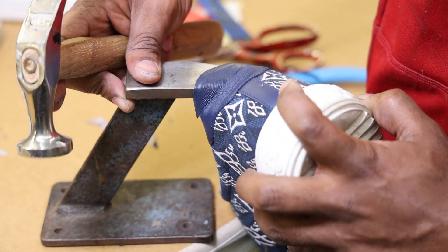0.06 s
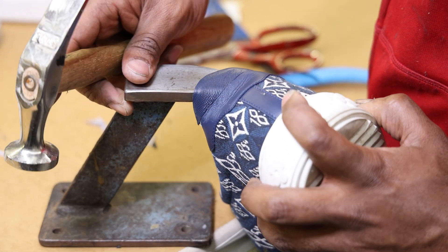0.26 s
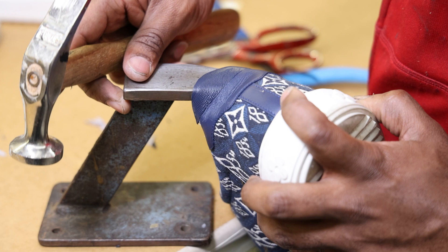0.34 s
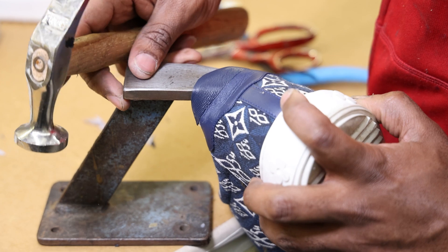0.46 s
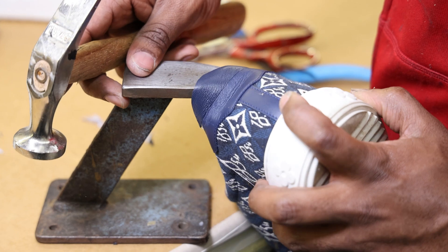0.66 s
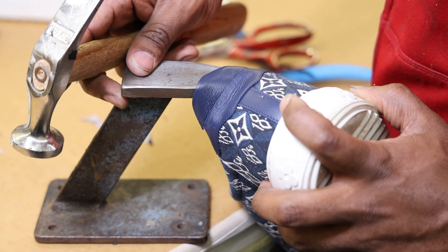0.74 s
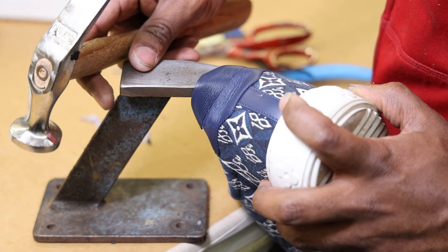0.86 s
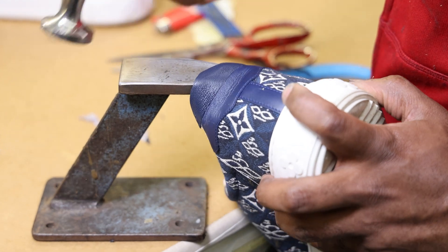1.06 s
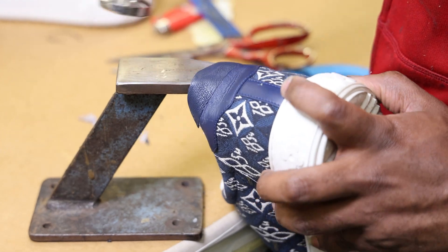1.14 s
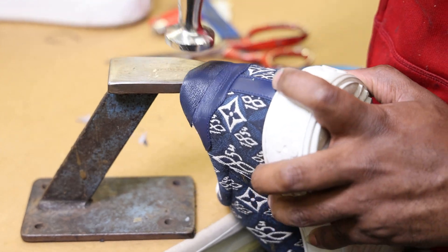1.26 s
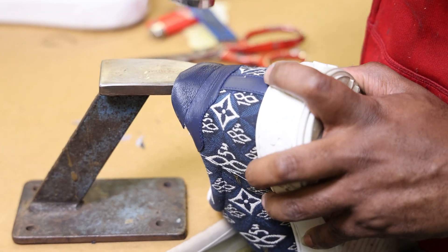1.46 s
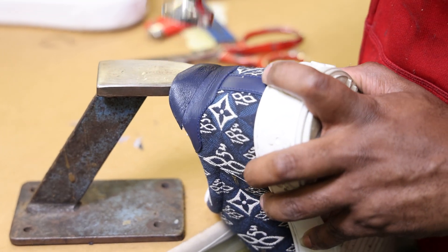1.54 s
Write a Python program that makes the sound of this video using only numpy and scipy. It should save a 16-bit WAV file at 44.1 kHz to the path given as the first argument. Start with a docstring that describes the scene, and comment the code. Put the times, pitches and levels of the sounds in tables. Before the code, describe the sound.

A steel hammer knocks once, hard, on an iron stand, with a short metallic ring and the echo of a small workshop. Faint scuffs, bumps and ticks follow as a shoe is shifted, heard close over soft room noise.

```python
"""A steel hammer knocks on the iron stand of a cobbler's bench in a small, live workshop.
At first a lighter knock is dying away, and the hammer head touches down with a faint clink.
At 0.2 s comes one hard knock: a sharp clack, a short ring of iron and the room's echo.
Near 0.9 s the hammer is lifted off with a soft scuff, and a shoe is shifted on the stand
with dull bumps, rubbing and small ticks. Soft room noise lies under it all."""
import sys
import numpy as np
from scipy import signal
from scipy.fft import rfft, irfft
from scipy.io import wavfile
from scipy.ndimage import uniform_filter1d

SR = 44100
rng = np.random.default_rng(int(sys.argv[2]) if len(sys.argv) > 2 else 0)


def bounce(signal):
    """Save signal as a 16-bit WAV file at the path given by the first command-line argument."""
    frames = np.transpose(np.atleast_2d(signal))
    limited = np.clip(frames, -1, 1)
    pcm = np.round(limited * 32767).astype(np.int16)
    wavfile.write(sys.argv[1], SR, pcm)


N = 70560  # 1.6 seconds
ATTACK_S = 0.0019  # how fast a struck sound rises

# Hammer blows. Each row: start in seconds, level in dB, treble tilt in dB per octave.
KNOCKS = [(-0.03, -24.5, 6), (0.2044, -1, -0.5)]

def knock(db, tilt_db):
    """A blow makes a clack, rings the stand, fills the room and thuds faintly in the bench."""
    blow = clack(tilt_db) + stand_ring(tilt_db) + echo(tilt_db)
    bench_thud = ringing_tone(hz=90, db=-55, fade_s=0.66)
    return amp(db) * (blow + bench_thud)


# The clack's tone colour. Each row: frequency in Hz, relative level in dB.
CLACK_SPECTRUM = [(35, -53.5), (70, -25), (150, -16.5), (280, -10.5), (600, -6.5), (1100, -3.5),
                  (2300, -2.5), (3300, -8.5), (5000, -11), (8500, -16), (12000, -27), (16000, -39)]

def clack(tilt_db):
    """Hammer, stand and bench shake at many pitches at once and stop quickly."""
    t = np.arange(SR) / SR
    envelope = strike(ATTACK_S, fade_s=0.071)
    burst = colour(flatten(hiss() * envelope), CLACK_SPECTRUM, tilt_db)
    burst *= np.sqrt(np.mean(envelope ** 2))  # back to the envelope's strength
    contact = np.minimum(t / 0.0003, 1)
    return amp(-16.5) * burst * contact * (t < 0.5)


# The stand's own tones. Each row: pitch in Hz, relative level in dB, fade time in seconds.
STAND_TONES = [(658, -4, .36), (740, -3, .32), (856, -6, .37), (986, -2, .41), (1100, -4, .38),
               (1130, 0, .36), (1409, -5, .47), (1547, -5, .46), (1729, -7, .42), (1878, -3, .3),
               (2157, 0, .22), (2353, 1, .26), (2414, -2, .28), (2466, -2, .24), (2617, -4, .28),
               (3134, -2, .25), (3618, -1, .23), (4335, -6, .24)]

def stand_ring(tilt_db):
    """The struck iron rings briefly; a brighter blow has weaker low tones."""
    top_hz = STAND_TONES[-1][0]
    return sum(ringing_tone(hz, db - 32.5 + tilt_db * np.log2(hz / top_hz), fade_s)
               for hz, db, fade_s in STAND_TONES)


# The echo's tone colour. Each row: frequency in Hz, relative level in dB.
ECHO_SPECTRUM = [(25, -74), (50, -41), (80, -28.5), (120, -27), (200, -19), (270, -12), (450, -10),
                 (700, -6), (1100, -1.5), (1600, -6.5), (2000, -5), (2700, -5), (4460, -8.5), (7730, -20.5),
                 (13800, -33.5), (16000, -47.5)]

def echo(tilt_db, build_s=0.017):
    """The room answers a knock with a wash of sound that builds and dies away."""
    build_up = np.minimum(np.arange(SR) / SR / build_s, 1)
    return amp(-20) * build_up * die_away(colour(hiss(), ECHO_SPECTRUM, tilt_db))


# Light touches of the hammer head. Each row: start in seconds, level in dB.
CLINKS = [(0.014, -58.5)]
# The tones a touch rings. Each row: pitch in Hz, relative level in dB, fade time in seconds.
CLINK_TONES = [(520.7, 2, .4), (700, 2, 0.21), (1244, -2, 0.26), (2480, -0.5, 0.43), (2890, -3.5, 0.23),
               (2905, -4.5, 0.32), (3564, -8.5, 0.32), (4330, -5.5, 0.27), (4670, -4.5, .36),
               (6270, -7, 0.16)]

def clink(db):
    """Steel set down lightly on iron rings a few clear tones."""
    return sum(ringing_tone(hz, db + level, fade_s) for hz, level, fade_s in CLINK_TONES)


# The hammer leaving the stand. Each row: start in seconds, level in dB.
SCUFFS = [(0.895, -58), (0.914, -57.5)]
# The scuff's tone colour. Each row: frequency in Hz, relative level in dB.
SCUFF_SPECTRUM = [(180, -37), (300, -8), (619, -7.5), (853, -9), (1620, -7.5), (1910, -11), (2310, -5),
                  (2550, -9.5), (3810, -14), (14000, -50)]

def scuff(db):
    """Steel brushes iron, and the noise fades in the room."""
    return amp(db) * colour(hiss(), SCUFF_SPECTRUM) * strike(rise_s=0.0034, fade_s=0.44)


# Dull bumps of shoe and hammer on the stand.
# Each row: start in seconds, level in dB, pitch in Hz, width in octaves, fade time in seconds.
BUMPS = [(-0.01, -54, 480, 0.75, 0.45), (-0.01, -64, 131, .8, 0.49), (0.622, -71.5, 220, 0.56, .4),
         (0.628, -68.5, 79, 0.5, 0.33), (0.9, -68.5, 162, 0.47, 0.37), (0.925, -62.5, 540, 0.28, 0.49),
         (0.952, -52, 543, 0.25, 0.22)]
# Small ticks of handling, with the same columns as the bumps.
TICKS = [(0.181, -66, 11100, 0.71, 0.075), (0.617, -67.5, 2900, 0.14, .07), (1.194, -74, 4470, 0.74, 0.071),
         (1.276, -65.5, 3990, 0.63, 0.049), (1.29, -65, 3600, 0.59, .04), (1.407, -68, 3480, 0.47, 0.043),
         (1.493, -77, 7000, 0.62, 0.041)]

def tap(db, hz, octaves, fade_s):
    """A light contact rings one broad band of pitches: low for a bump, high for a tick."""
    distance = np.log2((np.fft.rfftfreq(SR, 1 / SR) + 1) / hz) / octaves
    band = irfft(rfft(hiss()) / (1 + np.abs(distance) ** 3), SR)
    return amp(db) * unit(band) * strike(ATTACK_S, fade_s)


# Rubs of fingers and shoe.
# Each row: start in seconds, length in seconds, level in dB, treble tilt in dB per octave.
RUBS = [(0.681, 0.32, -74.5, -2.4), (1.175, 0.077, -72.5, 0.5), (1.206, 0.02, -71, -0.5),
        (1.24, 0.14, -76.5, -1), (1.266, 0.025, -66.5, 2.5), (1.376, 0.1, -80, 1), (1.527, 0.026, -74.5, 2)]
# A rub's tone colour. Each row: frequency in Hz, relative level in dB.
RUB_SPECTRUM = [(300, -13), (1200, -4.5), (2500, 1), (4200, 0.5), (6000, -5.5), (10000, -15),
                (12500, -14.5), (15500, -25)]

def rub(length_s, db, tilt_db, slips_per_s=3700):
    """Many tiny slips of uneven strength blend into one stroke that swells and sinks."""
    slips = hiss() * (rng.random(SR) < slips_per_s / SR)
    slips *= amp(2.5 * np.minimum(rng.exponential(1, SR), 4))  # a few stand out
    progress = np.minimum(np.arange(SR) / SR / length_s, 1)
    arch = 2 * np.sqrt(progress * (1 - progress))
    return amp(db) * colour(slips, RUB_SPECTRUM, tilt_db) * arch


# How long sound lingers in the workshop. Each row: frequency in Hz, fade time in seconds.
ROOM_FADES = [(100, 0.46), (260, 0.46), (420, 0.38), (700, 0.32), (1000, 0.34), (1450, 0.42), (2000, 0.38),
              (2800, 0.37), (4850, 0.32), (8000, 0.29), (12800, 0.25)]

def die_away(x):
    """The room soaks up each band of a sound at its own rate, the treble fastest."""
    hz, t, bands = signal.stft(x, SR, nperseg=256)
    fade = amp(-60 * t / look_up(ROOM_FADES, hz)[:, None])
    return signal.istft(bands * fade, SR)[1][:len(x)]


def reverb(x):
    """Countless reflections in the workshop give a sound a smooth tail."""
    tail = die_away(hiss())
    return signal.fftconvolve(x, tail / np.linalg.norm(tail))[:N]


# The room noise's tone colour. Each row: frequency in Hz, relative level in dB.
AIR_SPECTRUM = [(15, -39), (30, -19.5), (55, -8.5), (85, -6), (160, -6), (220, -4.5), (300, -3),
                (400, -5.5), (600, -4), (760, -8.5), (1370, -8.5), (2000, -12), (3000, -14.5),
                (4490, -18.5), (10700, -38.5), (16000, -43.5)]
# Faint drones in the room. Each row: pitch in Hz, width in Hz, level in dB.
DRONES = [(170, 17, -87), (294.7, 7.9, -82), (624.5, 20, -83.5)]

def room_air():
    """Soft room noise, with narrow bands of noise heard as wavering drones."""
    freqs = np.fft.rfftfreq(N, 1 / SR)
    air = amp(-70.5) * colour(rng.standard_normal(N), AIR_SPECTRUM)
    for hz, width, db in DRONES:
        peak = 1 / (1 + (2 * (freqs - hz) / width) ** 2)
        air += amp(db) * unit(irfft(rfft(rng.standard_normal(N)) * peak, N))
    return air


def ringing_tone(hz, db, fade_s):
    """One pure tone of a struck object."""
    cycles = hz * np.arange(SR) / SR + rng.random()
    return amp(db) * strike(ATTACK_S, fade_s) * np.sin(2 * np.pi * cycles)


def strike(rise_s, fade_s):
    """One second of loudness shape: a quick rise, and a fall of 60 dB per fade time."""
    t = np.arange(SR) / SR
    return np.minimum(t / rise_s, 1) * amp(-60 * t / fade_s)


def flatten(x):
    """Evens out a burst's spectrum: a sharp contact shakes all bands alike."""
    spectrum = rfft(x)
    power = uniform_filter1d(np.abs(spectrum) ** 2, size=300)
    return irfft(spectrum * np.sqrt(power.mean() / power), len(x))


def colour(x, points, tilt_db=0):
    """Gives a sound a tone colour, tilted around 2 kHz, at strength 1."""
    hz = np.fft.rfftfreq(len(x), 1 / SR)
    octaves = np.log2(np.maximum(hz, 500) / 2000)
    gain = amp(look_up(points, hz) + tilt_db * octaves)
    return unit(irfft(rfft(x) * gain, len(x)))


def look_up(points, hz):
    """Reads between a table's rows along a scale of octaves."""
    freqs, values = np.transpose(points)
    return np.interp(np.log(hz + 1), np.log(freqs + 1), values)


def hiss():
    """One second of white noise."""
    return rng.standard_normal(SR)


def amp(db):
    """Turns decibels into a gain."""
    return 10 ** (np.asarray(db) / 20)


def unit(x):
    """Scales a sound to an average strength (rms) of 1."""
    return x / np.sqrt(np.mean(x ** 2) + 1e-20)


def add(mix, start_s, sound):
    """Mixes a sound in at its start time, which may be before zero."""
    at = round(start_s * SR)
    sound = sound[max(-at, 0):]
    part = mix[max(at, 0):][:len(sound)]
    part += sound[:len(part)]


def scene():
    """Knocks and handling over the still air of the workshop, in one channel."""
    mix, rubbing = room_air(), np.zeros(N)
    for table, source in (KNOCKS, knock), (CLINKS, clink), (BUMPS, tap), (TICKS, tap), (SCUFFS, scuff):
        for start_s, *settings in table:
            add(mix, start_s, source(*settings))
    for start_s, *settings in RUBS:
        add(rubbing, start_s, rub(*settings))
    return (mix + rubbing + amp(-2.5) * reverb(rubbing))[None]


def record(dry):
    """The recorder rounds off the highest peaks and cuts the very top of the treble."""
    ceiling, cutoff_hz = 0.22, 16200
    rounded = dry / (1 + (dry / ceiling) ** 6) ** (1 / 6)
    low_pass = signal.firwin(511, cutoff_hz, window=("kaiser", 9), fs=SR)
    return signal.oaconvolve(rounded, low_pass[None], "same")


dry = scene()
out = record(dry)
bounce(out)
```